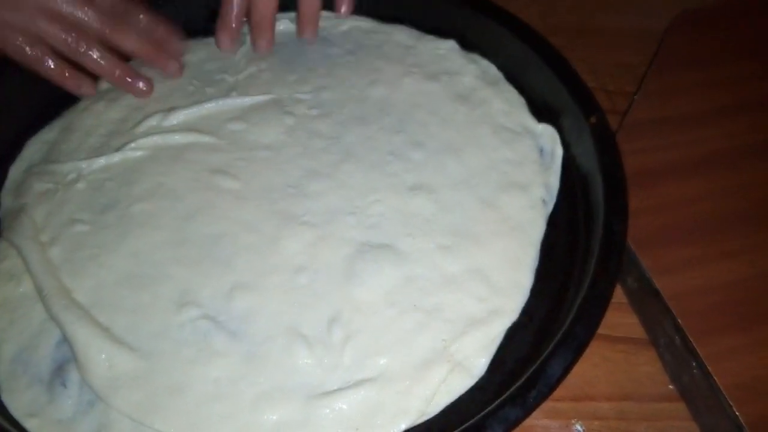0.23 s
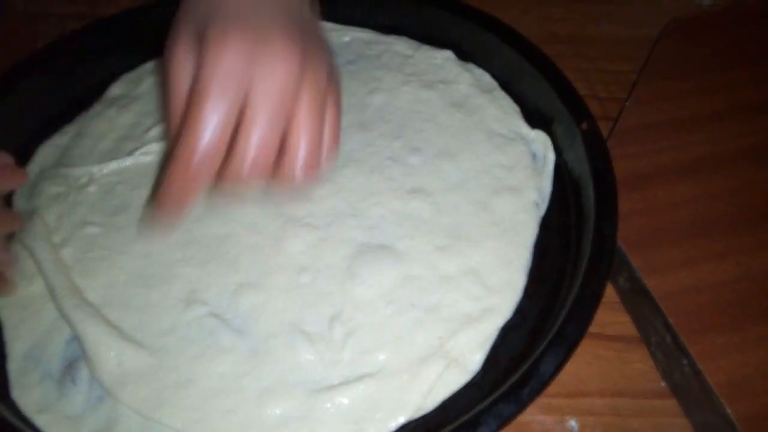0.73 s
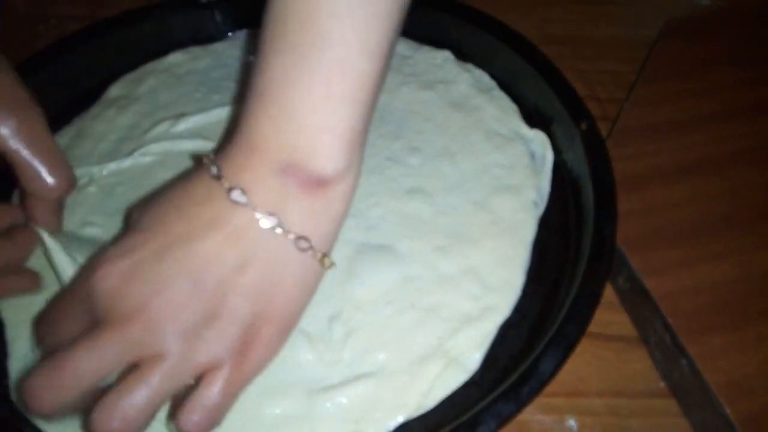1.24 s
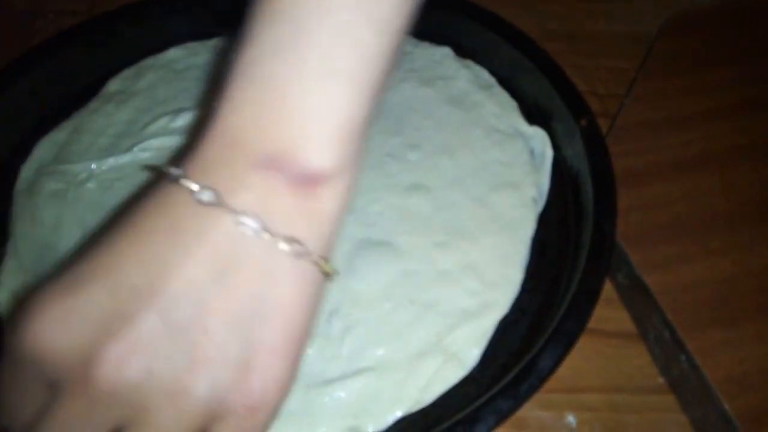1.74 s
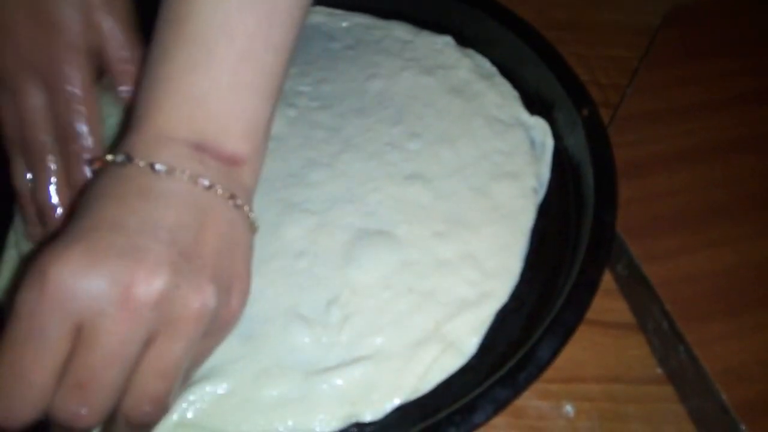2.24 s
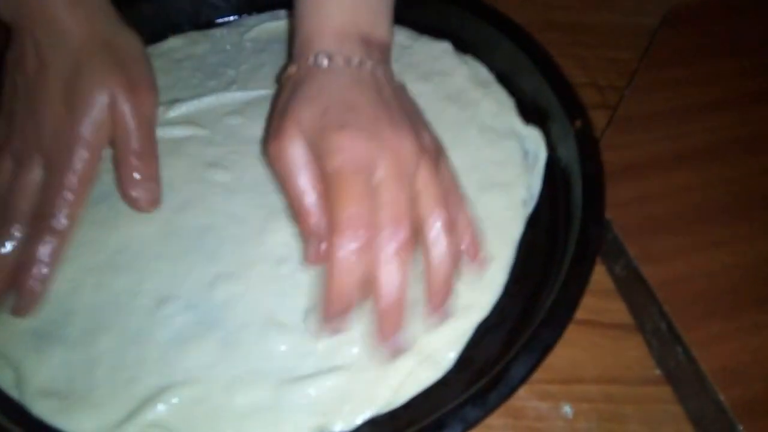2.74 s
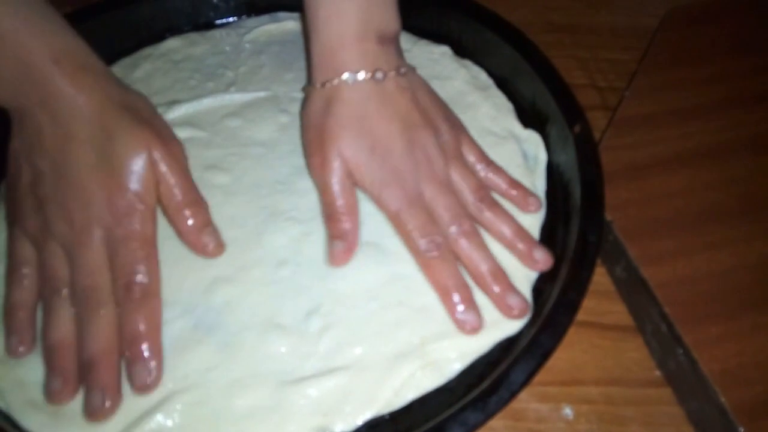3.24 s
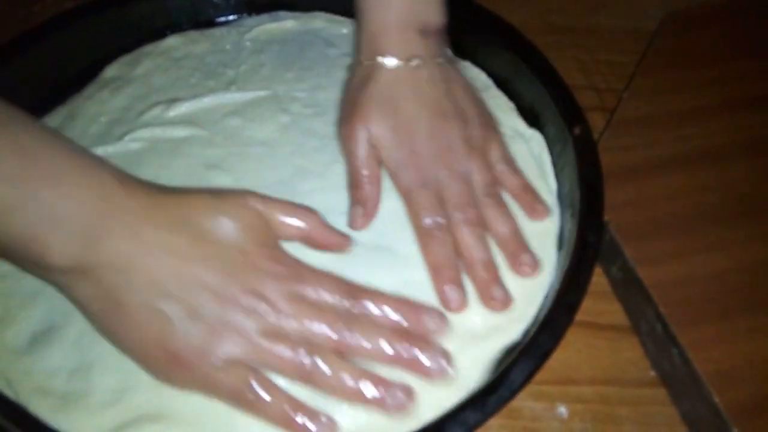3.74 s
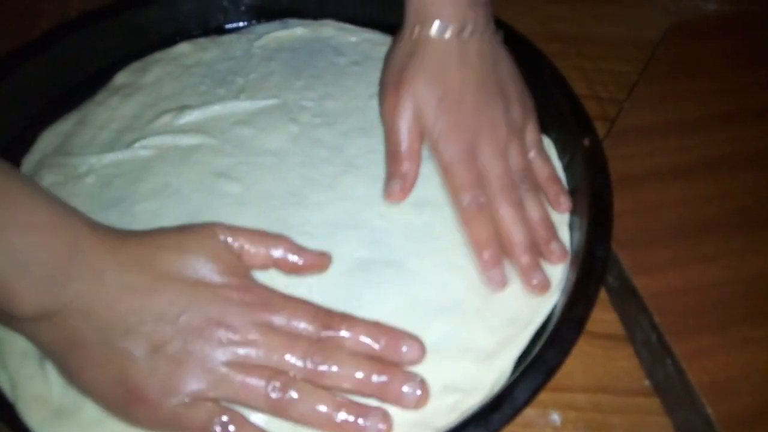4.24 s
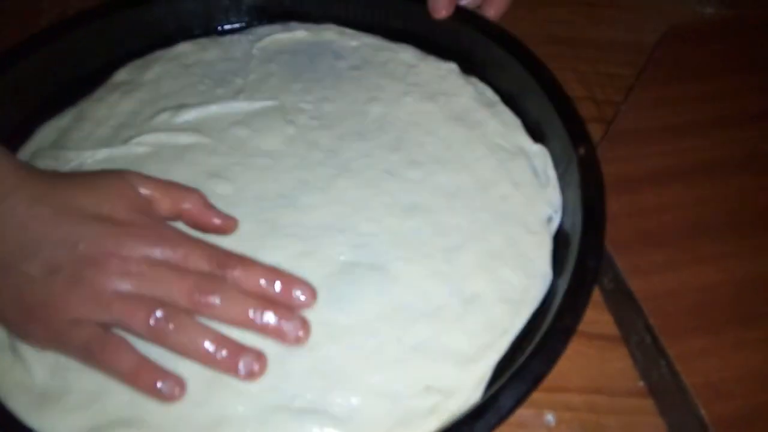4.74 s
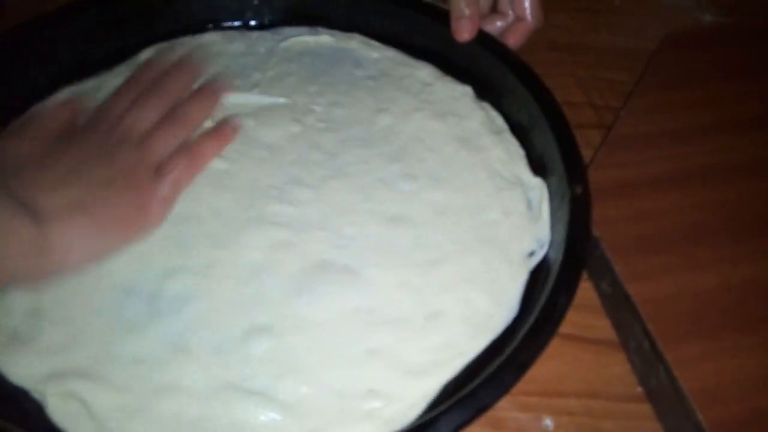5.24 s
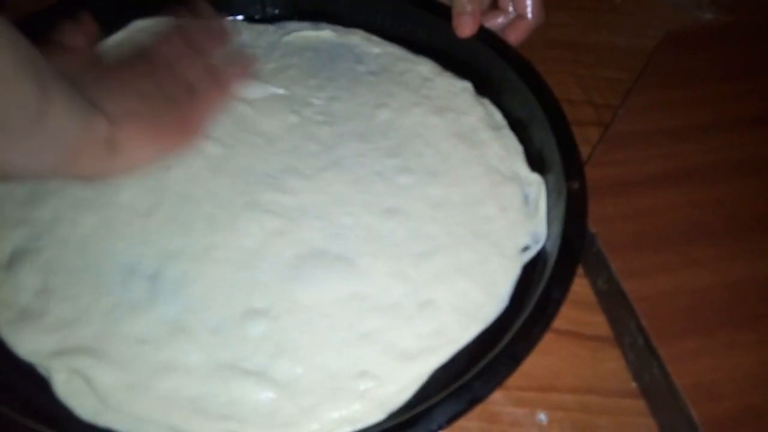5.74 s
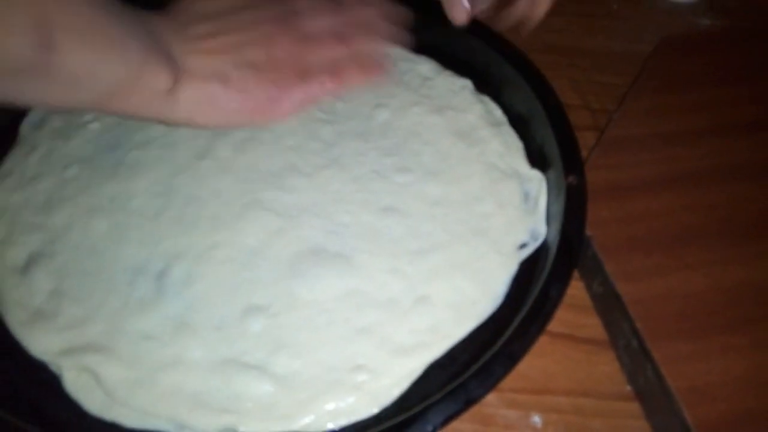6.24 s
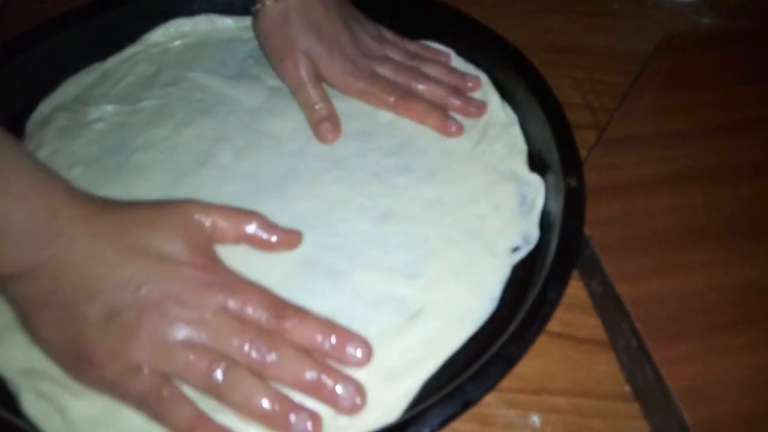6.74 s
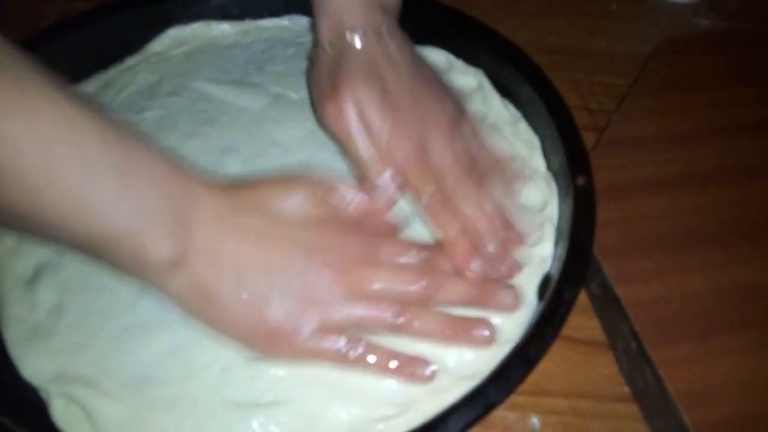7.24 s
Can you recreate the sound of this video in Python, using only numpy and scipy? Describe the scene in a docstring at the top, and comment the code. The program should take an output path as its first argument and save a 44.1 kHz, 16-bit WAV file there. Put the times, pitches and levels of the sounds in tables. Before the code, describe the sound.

Soft presses, then quick wet slaps of oily hands on dough in a baking tray, with faint birdlike whistles early on.

```python
"""A small kitchen: oiled hands pat a sheet of dough flat in a metal baking tray on a wooden table.
Soft presses come first, then quick slaps: wet skin cracks on the dough and rings trapped air pockets,
and the damped tray and table thump under it. Between the blows the hands rub and peel off with a
sticky crackle. Faint whistles, like a bird's, come from further off."""
import sys
import numpy as np
from scipy import signal
from scipy.fft import rfft, irfft, next_fast_len
from scipy.io import wavfile
from scipy.ndimage import uniform_filter1d

SR = 44100
rng = np.random.default_rng(int(sys.argv[2]) if len(sys.argv) > 2 else 0)


def transcribe(signal):
    """Save signal, clipped to [-1, 1], as a 16-bit WAV file at the path in sys.argv[1]."""
    frames = np.atleast_2d(signal).T
    limited = np.clip(frames, -1, 1)
    pcm = np.round(limited * 32767).astype(np.int16)
    wavfile.write(sys.argv[1], SR, pcm)


N = 330597
BLOW_T = np.arange(SR // 2) / SR   # time axis of one blow, s
USUAL_SMACK_DB, USUAL_THUMP_DB = -34, -30.5   # a middling pat

# Skin smacks the dough, the hand's weight thumps the tray. Each row: start in seconds, smack in dB,
# wet crack and air pop in dB re smack, air pocket in Hz, thump in dB, favoured tray pitch in Hz.
PATS = [(1.149, -50.5, -2.5, -5, 1520, -48.5, 174), (1.916, -47, -1, -8, 1600, -46.5, 168),
        (2.532, -48, 0, -6, 1540, -46, 170), (2.835, -44.5, 5, -10, 1880, -39.5, 179),
        (2.952, -57, -1, -9, 1940, -45.5, 194), (3.259, -45.5, 1, 3.5, 1390, -33.5, 188.4),
        (3.5274, -30, 2.5, -10, 1870, -27.5, 144), (3.773, -28, 3, -14.5, 1360, -27.5, 144),
        (4.0175, -27.5, 1.5, 5, 1180, -25, 258), (4.2463, -29.5, -8, -0.5, 1030, -23, 145),
        (4.268, -34, -1, -2, 1160, -31.5, 200), (4.4034, -40, -1, -5, 1810, -37, 175),
        (4.4936, -26.5, 0.5, -2, 1380, -21, 163), (4.6267, -21.5, -0.5, 3, 1065, -21.5, 184),
        (4.668, -31.5, 9.5, 8, 1200, -25.5, 164), (4.7193, -33.5, -4, -2.5, 980, -28.5, 153),
        (4.861, -39.5, 0.5, -9, 1237, -42.5, 178), (4.9407, -25.5, -4, -9, 1850, -29, 204),
        (5.0817, -36.5, 1.5, -8.5, 1310, -36.5, 172), (5.3402, -29, 0, -12, 1470, -30, 199),
        (5.5014, -33, 3.5, -16, 1990, -33.5, 170), (5.6003, -31.5, 2, -13, 1270, -29.5, 203),
        (5.7508, -32.5, 3, -10, 1830, -32, 170), (5.851, -29, 4.5, -7, 1260, -28.5, 188),
        (5.9999, -36, -1.5, -9, 1880, -32.5, 170), (6.097, -42.5, -11, -0.5, 1270, -27.5, 213),
        (6.227, -46, -9, 1.5, 1290, -43, 196), (6.5133, -44, 12, 7, 1080, -24, 148),
        (6.556, -40, -3.5, 0.5, 1630, -37, 191), (6.7521, -45.5, 10, -8, 1040, -29, 146),
        (6.7842, -47, 7, -12, 1350, -38, 205), (6.9581, -38, -12, -8.5, 1340, -33.5, 207),
        (6.987, -54, 1, 13.5, 1410, -35, 185), (7.051, -34, 0, -19, 1820, -30, 121),
        (7.206, -53.5, 12.5, 6, 1200, -36.5, 177), (7.2478, -38, -7, -1.5, 1330, -33, 189),
        (7.3137, -25, 1.5, -5.5, 1180, -26, 169.6)]


def from_db(db):
    """Decibels to gain."""
    return 10 ** (np.asarray(db) / 20)


def unit_rms(x):
    """Scale to rms 1."""
    return x / np.sqrt(np.mean(x ** 2) + 1e-20)


def unit_peak_rms(x, window_s):
    """Scale the loudest window to rms 1."""
    power = uniform_filter1d(x ** 2, max(2, int(window_s * SR)), mode="constant")
    return x / np.sqrt(power.max() + 1e-20)


def at_hz(points, hz):
    """Interpolate a table over log frequency."""
    points_hz, values = np.transpose(points)
    return np.interp(np.log(np.maximum(hz, 1)), np.log(points_hz), values)


def coloured(x, spectrum):
    """Shape noise by (Hz, dB) points; rms 1."""
    size = next_fast_len(N)
    hz = np.arange(size // 2 + 1) * SR / size
    return unit_rms(irfft(rfft(x, size) * from_db(at_hz(spectrum, hz)), size)[:N])


def butter(x, hz, kind, order=2):
    """Causal Butterworth filter."""
    return signal.sosfilt(signal.butter(order, hz, kind, fs=SR, output="sos"), x + 1e-18)


def resonate(x, hz, width_hz):
    """Two-pole resonance, peak gain 1."""
    r = np.exp(-np.pi * width_hz / SR)
    feedback = [1, -2 * r * np.cos(2 * np.pi * hz / SR), r * r]
    return signal.lfilter(np.array([1, 0, -1]) * (1 - r * r) / 2, feedback, x + 1e-18)


def add(out, start_s, sound):
    """Mix a sound in at start_s."""
    start = max(0, round(start_s * SR))
    out[start:start + len(sound)] += sound[:max(0, N - start)]


def microphone(x):
    """Treble roll-off, minimum phase: nothing sounds ahead of a slap."""
    # Each row: frequency in Hz, gain in dB.
    response = [(5400, 0), (6400, 0.5), (6900, -4.5), (7400, -7.5), (8300, -13), (10000, -16), (15000, -28)]
    size = 2048
    hz = np.arange(size // 2 + 1) * SR / size
    cepstrum = irfft(np.log(from_db(at_hz(response, hz))))
    cepstrum[1:size // 2] *= 2
    cepstrum[size // 2 + 1:] = 0
    return signal.fftconvolve(x, irfft(np.exp(rfft(cepstrum))))[:N]


def room_tone(level_db):
    """Steady, mostly low noise of the quiet kitchen."""
    # Each row: frequency in Hz, relative density in dB.
    spectrum = [(15, -27), (25, 2), (45, -15.5), (76, -2), (165, 2), (235, -3.5), (590, -9.5), (840, -12),
                (1100, -13), (3000, -17), (3700, -15), (5200, -21.5), (6400, -21.5), (8000, -26),
                (15000, -37)]
    return from_db(level_db) * coloured(rng.standard_normal(N), spectrum)


def kitchen_reverb(x, colour, build_s):
    """Reflections crowd in within milliseconds; each octave decays at its own rate."""
    # Each row: frequency in Hz, T60 in seconds.
    decay_times = [(100, 0.3), (400, 0.22), (1500, 0.24), (5000, 0.33), (10000, 0.1)]
    edges_hz = np.geomspace(60, 15360, 9)
    response = 0
    for low, high in zip(edges_hz, edges_hz[1:]):
        band = butter(rng.standard_normal(len(BLOW_T)), [low, high], "band", order=4)
        t60_s = at_hz(decay_times, np.sqrt(low * high))
        response += band * from_db(-60 * BLOW_T / t60_s)
    gains = from_db(at_hz(colour, np.arange(SR // 2 + 1)))   # 1 Hz grid
    response = irfft(rfft(response, SR) * gains)[:len(BLOW_T)]
    response *= 1 - np.exp(-BLOW_T / build_s)
    return signal.fftconvolve(x, response / np.sqrt(np.sum(response ** 2)))[:N]


def whistles(waver):
    """Birdlike, nearly pure tones swell and fade as their pitch bends along an arc."""
    # Each row: start and length in seconds, level in dB, first, middle and last pitch in Hz.
    notes = [(0.0, 0.028, -53.5, 2600, 2640, 2510), (0.228, 0.13, -64.5, 2900, 2580, 2550),
             (0.385, 0.083, -58, 2550, 3040, 3290), (0.451, .09, -60, 3600, 4120, 3650),
             (0.464, .11, -62.5, 3400, 3310, 3000), (0.75, 0.15, -66, 2520, 2780, 2570),
             (2.97, 0.112, -63, 3450, 3180, 3380), (3.138, .11, -66, 3250, 3010, 3550),
             (3.268, 0.074, -57, 3650, 3760, 3300), (3.386, 0.22, -62, 3140, 3300, 3230)]
    out = np.zeros(N)
    for start_s, length_s, db, *pitches_hz in notes:
        along = np.linspace(0, 1, int(length_s * SR))
        hz = np.polyval(np.polyfit([0, .5, 1], pitches_hz, 2), along)
        jitter = unit_rms(butter(rng.standard_normal(len(BLOW_T)), 150, "low"))[:len(along)]
        tone = np.sin(2 * np.pi * np.cumsum(hz * (1 + waver * jitter)) / SR)
        swell = np.sqrt(np.abs(np.sin(np.pi * along)))
        add(out, start_s, from_db(db) * swell * tone)
    return out


def oil_snaps(per_s, spread_db):
    """Oil threads break at random: many tiny impulses, a few large."""
    sizes = from_db(spread_db * np.minimum(rng.exponential(1, N), 5))
    signs = rng.choice([-1, 1], N)
    return sizes * signs * (rng.random(N) < per_s / SR)


def rubbing_hands(rub_gain_db, sticky_gain_db):
    """Pressing palms rumble through the tray; sticky skin crackles."""
    # Each row: time in seconds, crackle in dB, rubbing in dB.
    activity = [(0.0, -63, -58), (1.13, -75, -72.5), (2.8, -64, -56.5), (2.92, -62, -46.5),
                (3.4, -66, -62.5), (3.8, -63.5, -42.5), (4.28, -57.5, -53.5), (4.61, -55, -39.5),
                (4.97, -73, -46), (5.14, -60, -50.5), (5.3, -55.5, -56.5), (5.72, -55, -47),
                (6.01, -52, -38.5), (6.37, -62.5, -67), (6.55, -75, -41), (6.68, -62, -47),
                (7.27, -53, -36), (7.5, -55, -53)]
    # Each row: frequency in Hz, relative density in dB.
    rub_spectrum = [(30, -17.5), (65, 6), (100, 3), (190, -7), (330, -12.5), (550, -27), (1200, -31.5),
                    (3000, -45)]
    sticky_spectrum = [(400, -13), (1200, -0.5), (2600, -5), (4700, -0.5), (6300, -12), (8500, -21.5)]
    times_s, *levels_db = np.transpose(activity)
    sticky_db, rub_db = [np.interp(np.arange(N) / SR, times_s, db) for db in levels_db]
    rumble = coloured(rng.standard_normal(N), rub_spectrum)
    crackle = coloured(oil_snaps(per_s=2500, spread_db=4.0), sticky_spectrum)
    return from_db(rub_db + rub_gain_db) * rumble + from_db(sticky_db + sticky_gain_db) * crackle


def peeling(peel_db, slide_gain_db):
    """The oil film tears in a swell of fizz as fingers slide or the palm lifts after a pat."""
    # Each row: centre in seconds, level in dB, Gaussian sigma in seconds.
    slides = [(0.467, -62, 0.098), (2.517, -61, 0.035), (2.758, -63.5, 0.022), (3.889, -51, 0.025),
              (4.37, -55, 0.014), (6.269, -52, 0.0076)]
    # Each row: frequency in Hz, relative density in dB.
    fizz_spectrum = [(600, -11), (1400, -4.5), (2600, -4), (3500, -3), (4800, 0), (6400, -9.5),
                     (8500, -18.5)]
    lift_delay_s, lift_sigma_s = 0.13, 0.02
    t = np.arange(N) / SR
    swells = np.zeros(N)
    for centre_s, db, sigma_s in slides:
        bell = np.exp(-.5 * np.minimum(((t - centre_s) / sigma_s) ** 2, 60))
        swells += from_db(db + slide_gain_db) * bell
    lift = np.exp(-.5 * ((BLOW_T - lift_delay_s) / lift_sigma_s) ** 2)
    for start_s, *_, thump_db, _ in PATS:
        force_db = thump_db - USUAL_THUMP_DB
        add(swells, start_s, from_db(peel_db + .75 * force_db) * lift)
    return swells * coloured(oil_snaps(per_s=5700, spread_db=5.5), fizz_spectrum)


def thumps(tray_gain_db, rise_cycles, detune, focus_db_per_octave, scatter_db):
    """Table and tray modes swell, cushioned by dough; where the hand lands decides which ring most."""
    # Wooden table, damped tray, upper knock. Each row: mode in Hz, relative level in dB, T60 in seconds.
    table_modes = [(64.9, 3.5, 0.17), (77, 7, 0.21), (95.8, -6, 0.32)]
    tray_modes = [(129.8, -7, 0.16), (146.2, -2, 0.18), (172, -6, 0.2), (196.9, -2, 0.24),
                  (215.7, -11, 0.3)]
    knock_modes = [(250.7, -4.5, 0.19), (282.4, -2.5, 0.2), (324, 1, 0.088), (375, -4.5, 0.14),
                   (448, -7.5, 0.11)]
    # Blows with no smack. Each row: start in seconds, thump in dB, favoured tray pitch in Hz.
    presses = [(0.327, -44, 175), (0.338, -41, 202), (0.526, -53, 175), (1.368, -52, 178),
               (2.397, -51, 140), (2.75, -44.5, 148), (2.883, -40.5, 194), (3.044, -46.5, 145),
               (3.907, -37, 124), (5.837, -24, 234), (6.306, -45, 207), (6.54, -31.5, 191)]
    weight_lag_s = .0015   # the hand's weight lands after the skin
    blows = [(s + weight_lag_s, db, hz, pop_db) for s, _, _, pop_db, _, db, hz in PATS]
    blows += [(s, db, hz, 0) for s, db, hz in presses]
    out = np.zeros(N)
    for start_s, thump_db, favoured_hz, pop_db in blows:
        force_db = thump_db - USUAL_THUMP_DB
        table_db = -3 + .75 * force_db
        tray_db = tray_gain_db + force_db
        knock_db = -6 + 1.28 * force_db + 0.3 * pop_db   # a cupped hand knocks more
        for modes, group_db in (table_modes, table_db), (tray_modes, tray_db), (knock_modes, knock_db):
            ringing = 0
            for hz, db, t60_s in modes:
                strength, hand_load, phase = rng.standard_normal(3)
                octaves_off = abs(np.log2(hz / favoured_hz)) if modes is tray_modes else 0
                mode_db = db + scatter_db * strength - focus_db_per_octave * octaves_off
                swell = 1 - np.exp(-BLOW_T * hz / rise_cycles)
                wave = np.sin(2 * np.pi * hz * (1 + detune * hand_load) * BLOW_T + phase)
                ringing += from_db(mode_db - 60 * BLOW_T / t60_s) * swell * wave
            add(out, start_s, from_db(USUAL_THUMP_DB + group_db) * unit_peak_rms(ringing, window_s=0.01))
    return out


def air_pockets(contacts, pockets, main_hz, cutoff_ratio):
    """Air rings between skin and dough, differently each touch; a soft touch has a low cutoff."""
    burst = 0
    for k, (ratio, width_hz, db) in enumerate(pockets):
        gain = (-1) ** k * from_db(db + rng.normal(0, 1))
        hz = main_hz * ratio * np.exp(0.088 * rng.normal())
        burst += gain * resonate(contacts, hz, width_hz)
    burst = butter(burst, np.clip(cutoff_ratio * main_hz, 100, .45 * SR), "low")
    return unit_peak_rms(burst, window_s=0.0056)


def skin_contacts(touches, decay_ms, grain, cutoff_ratio,
                  pop_gain_db, smack_gain_db, crack_gain_db, spill_gain_db):
    """An impulse and a dying spray of contacts ring the air pockets. Returns close sound, room spill."""
    # Air pockets, large to small. Each row: ratio to the main pitch, width in Hz, relative level in dB.
    pop_pockets = [(1, 620, 0.5), (1.5, 490, 7.5)]
    smack_pockets = [(.7, 460, 1), (1, 483, 5.5), (1.45, 344, -12)]
    crack_pockets = [(.76, 1295, -4.5), (1, 944, 7.5), (1.2, 1200, 1.5)]
    pop_hz = 509
    close, spill = np.zeros((2, N))
    t = BLOW_T[:SR // 12]
    for start_s, touch_db, crack_db, pop_db, pocket_hz in touches:
        contacts = grain * rng.standard_normal(len(t)) * np.exp(-t * 1000 / decay_ms)
        contacts[0] += 1
        crack_hz = 4443 + 7 * (touch_db - USUAL_SMACK_DB)   # harder cracks higher
        for pockets, main_hz, db in [(pop_pockets, pop_hz, pop_db + pop_gain_db),
                                     (smack_pockets, pocket_hz, smack_gain_db),
                                     (crack_pockets, crack_hz, crack_db + crack_gain_db)]:
            burst = air_pockets(contacts, pockets, main_hz, cutoff_ratio)
            add(close, start_s, from_db(touch_db + db) * burst)
        smack_and_crack = np.hypot(from_db(smack_gain_db), from_db(crack_db + crack_gain_db))
        add(spill, start_s, from_db([touch_db + spill_gain_db]) * smack_and_crack)   # one impulse
    return np.array([close, spill])


def wet_skin():
    """Pats snap, rolling palms squelch for longer, fingertips mostly crack."""
    # Palms roll down and squeeze out oil; fingertips tick. Each row: start in seconds, level in dB.
    palm_rolls = [(0.008, -57), (3.2413, -55), (4.2411, -31.5), (4.4795, -35), (4.62, -28), (5.3248, -45),
                  (5.575, -47.5), (5.8233, -42), (6.0818, -41), (6.502, -37.5), (6.7456, -39), (7.062, -45)]
    fingertips = [(0.5746, -53.5), (3.006, -55), (3.088, -52.5), (3.29, -48.5), (4.15, -61), (4.635, -31),
                  (4.7001, -31), (4.8913, -45), (5.493, -39), (5.7047, -39), (5.7846, -43.5), (6.608, -48),
                  (6.867, -48.5), (7.466, -46.5)]
    palm_pocket_hz, finger_pocket_hz = 1210, 1600
    pats = skin_contacts([row[:5] for row in PATS],
                         decay_ms=2.18, grain=0.21, cutoff_ratio=4.1,
                         pop_gain_db=-3.0, smack_gain_db=-1.07, crack_gain_db=-1.7, spill_gain_db=17.5)
    rolls = skin_contacts([(s, db, 0, 0, palm_pocket_hz) for s, db in palm_rolls],
                          decay_ms=8.1, grain=1.7, cutoff_ratio=1.24,
                          pop_gain_db=-2.5, smack_gain_db=-1.5, crack_gain_db=0.5, spill_gain_db=23.5)
    tips = skin_contacts([(s, db, 0, 0, finger_pocket_hz) for s, db in fingertips],
                         decay_ms=2.4, grain=0.48, cutoff_ratio=2.9,
                         pop_gain_db=-22, smack_gain_db=-9.5, crack_gain_db=-0.2, spill_gain_db=19.5)
    return pats + rolls + tips


def scene():
    """Skin, tray and hands close by in the kitchen; whistles further off. Mono."""
    # Reverb colours: what a slap radiates all round, and the room's answer to pops and thumps.
    # Each row: frequency in Hz, relative gain in dB.
    bright_colour = [(200, -15.5), (500, -2), (850, 4), (1300, 3.5), (2000, 4.5), (2800, 4), (4000, 2),
                     (5200, -3.5), (6400, -22), (7400, -16.5), (10000, -14)]
    low_colour = [(80, -17), (200, -2), (300, -3.5), (450, 1.5), (800, -6), (1300, -14), (3000, -33),
                  (8000, -16.5)]
    smacks, spill = wet_skin()
    tray = thumps(tray_gain_db=0.17, rise_cycles=0.68, detune=.025,
                  focus_db_per_octave=14.5, scatter_db=2.0)
    hands = rubbing_hands(rub_gain_db=-2.5, sticky_gain_db=-4)
    hands += peeling(peel_db=-60.5, slide_gain_db=0.5)
    bright_tail = kitchen_reverb(spill, bright_colour, build_s=0.0005)
    low_tail = from_db(-11.5) * kitchen_reverb(smacks + from_db(-9.0) * tray, low_colour, build_s=0.002)
    notes = whistles(waver=0.0156)
    far_notes = notes + from_db(-13.5) * kitchen_reverb(notes, bright_colour, build_s=0.0048)
    return (smacks + tray + hands + bright_tail + low_tail + far_notes + room_tone(level_db=-61))[None]


def record(dry):
    """Small microphone: little treble, no deep bass, rounded peaks, thin hiss."""
    # Each row: frequency in Hz, relative density in dB.
    hiss_spectrum = [(3000, 0), (8000, -10), (13300, -10.5), (14700, -3.5), (15500, 1), (16200, -24)]
    low_cut_hz, high_cut_hz, overload_level, hiss_db = 27, 15900, 1.4, -74
    dull = butter(microphone(dry[0]), low_cut_hz, "high")
    rounded = overload_level * np.tanh(dull / overload_level)
    hiss = from_db(hiss_db) * coloured(rng.standard_normal(N), hiss_spectrum)
    steep_lowpass = signal.ellip(10, .1, 70, high_cut_hz, fs=SR, output="sos")
    return signal.sosfilt(steep_lowpass, rounded + hiss)[None]


dry = scene()
out = record(dry)
transcribe(out)
```